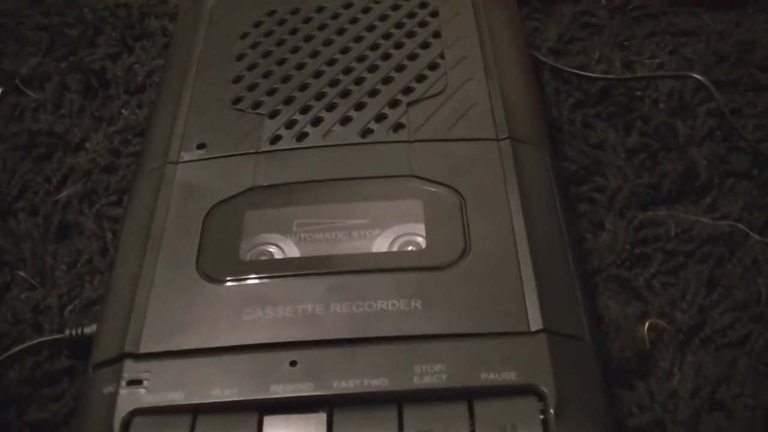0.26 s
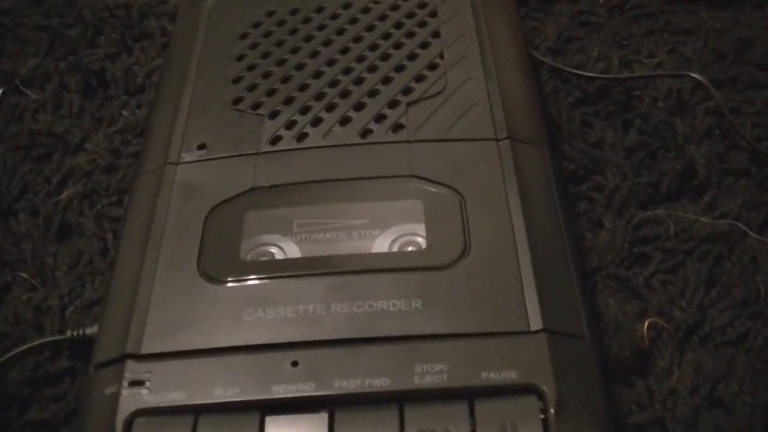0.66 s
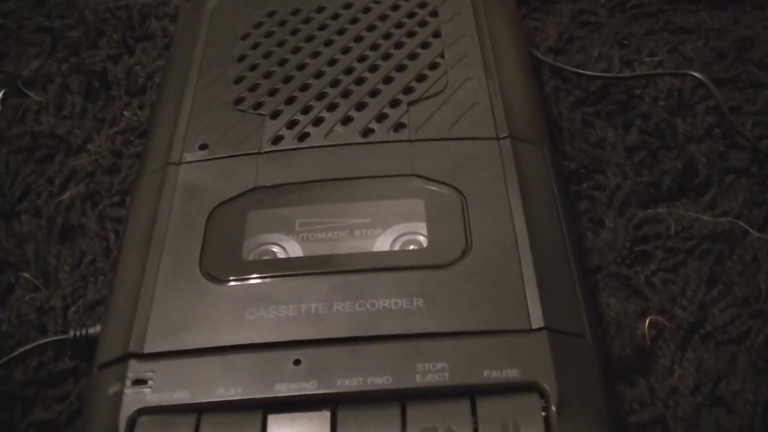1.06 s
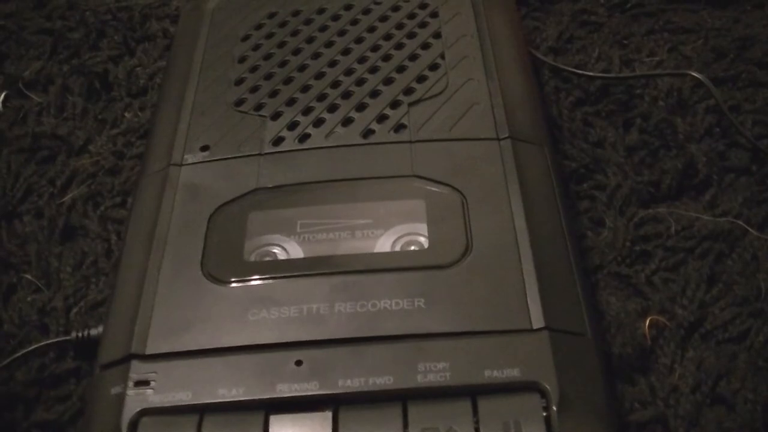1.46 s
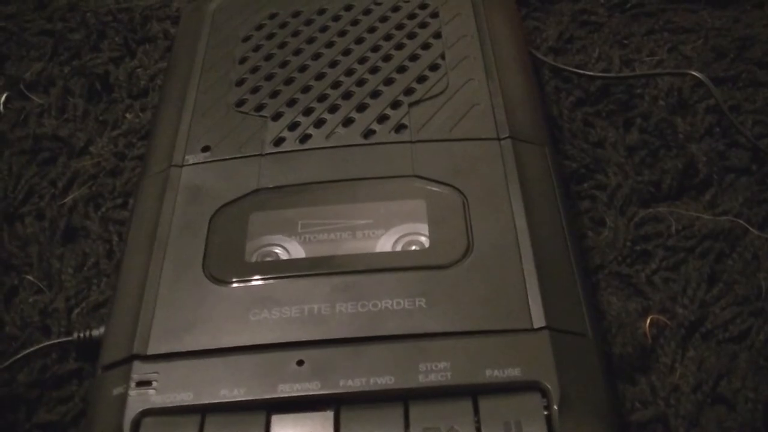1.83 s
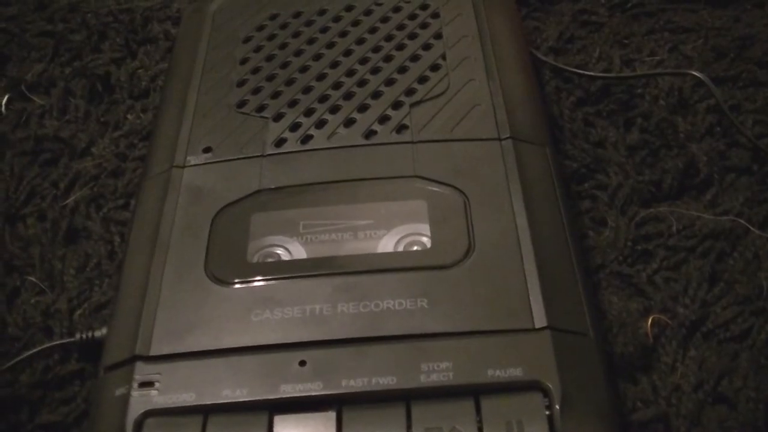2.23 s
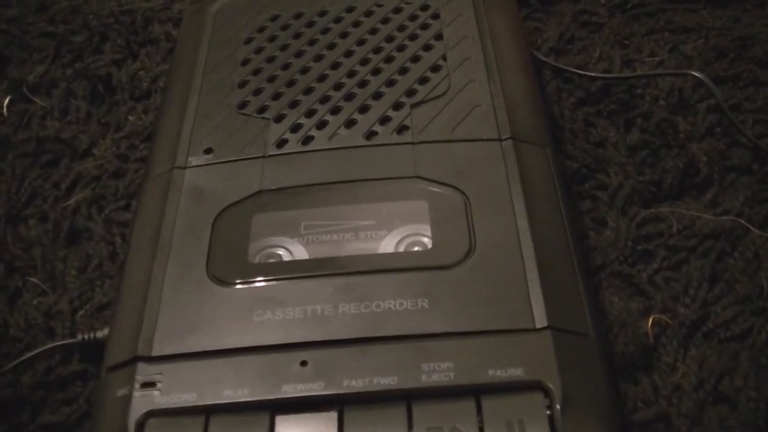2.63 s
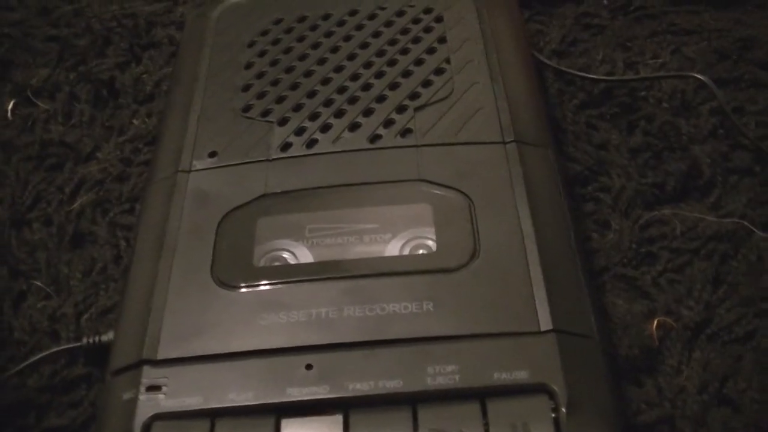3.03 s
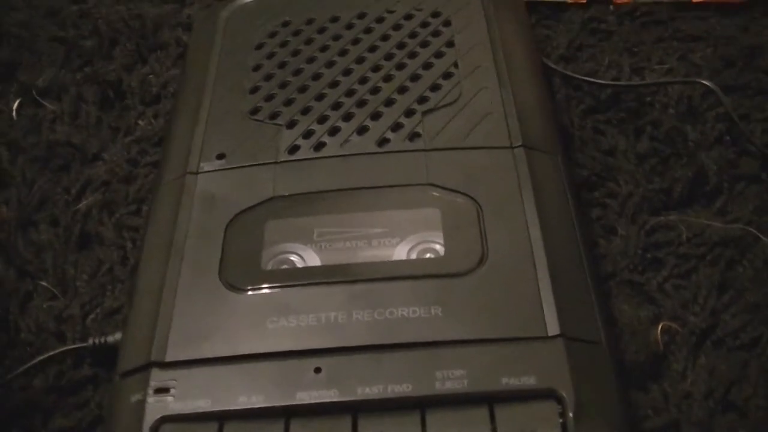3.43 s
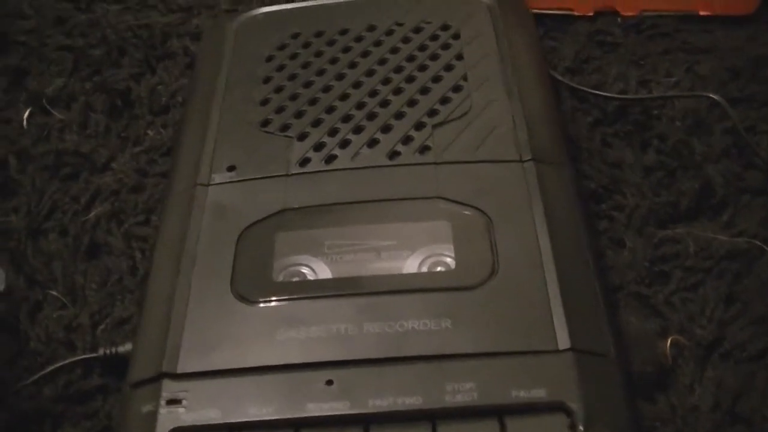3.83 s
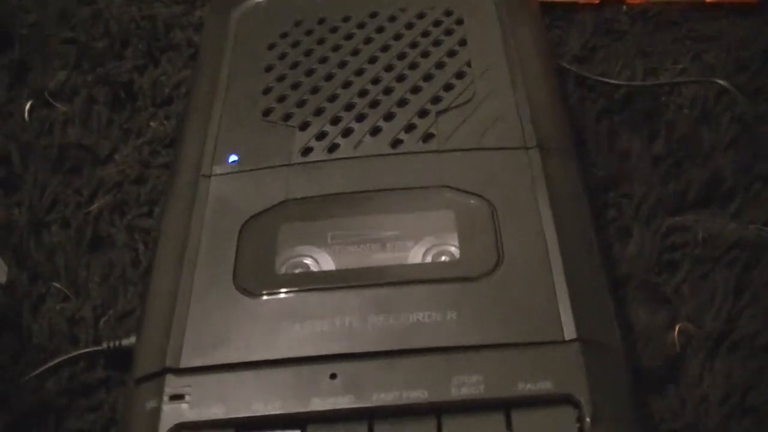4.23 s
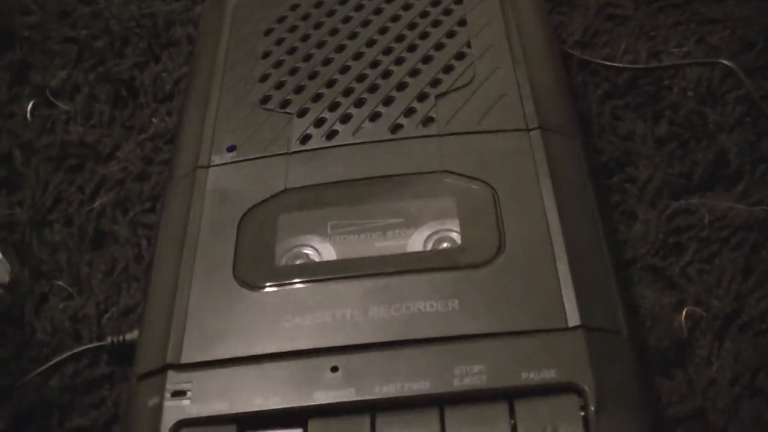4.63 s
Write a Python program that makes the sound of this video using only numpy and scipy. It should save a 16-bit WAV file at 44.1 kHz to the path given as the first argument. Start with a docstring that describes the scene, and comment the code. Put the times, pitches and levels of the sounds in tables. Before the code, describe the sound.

A cassette recorder rewinds with a fast bright plastic rattle, stops with a loud sharp key clack, then fainter clicks and faint speaker hiss.

```python
"""A fast rattle comes first: a cassette recorder rewinds, its drive shaft knocking the plastic case.
The tape runs out, the motor strains, a key snaps up, more keys are pressed and a loudspeaker hisses.
Each contact or key blow is a short noise burst or ring that excites resonances of the machine.
Friction, motor and loudspeaker are filtered noise; the loudspeaker adds a breathy whistle.
It is heard from close by, almost in the middle, in a quiet furnished room."""
import sys
import numpy as np
from scipy import signal
from scipy.fft import rfft, irfft
from scipy.io import wavfile
from scipy.ndimage import uniform_filter1d

SR = 44100
rng = np.random.default_rng(int(sys.argv[2]) if len(sys.argv) > 2 else 0)


def persist_wave(psi):
    """Save psi, clipped to +-1, as 16-bit WAV."""
    counts = np.round(np.clip(psi, -1, 1) * 32767).astype(np.int16)
    wavfile.write(sys.argv[1], SR, np.atleast_2d(counts).T)


def nominal_scale(level):
    """Amplitude ratio for a level in decibels (scalar or array-like)."""
    x = np.asarray(level, float) / 20
    return 10 ** x


N = 215230
T = np.arange(N) / SR   # time of every sample, in seconds

# Quiet room, colour of its noise: pitch_hz, relative_level_db
ROOM_TONE_COLOUR = [(18, -77), (30, -45), (149, -15), (170, -10), (245, -8), (287, -1), (554, -5.5),
                    (844, -0.5), (1390, -6.5), (1720, -5), (1960, -5.5), (2830, -8.5), (3670, -14),
                    (4300, -16.5), (16000, -29.5)]
# Steady hum: pitch_hz, rms_level_db
HUM_TONES = [(178, -83)]
# Dull bumps on the housing: start_s, relative_level_db
HOUSING_BUMPS = [(0.102, -62), (0.131, -50), (0.173, -53)]
# Loudspeaker hiss, its resonances: pitch_hz, width_hz, relative_level_db
HISS_RESONANCES = [(3700, 300, 3), (4700, 1500, -8), (6600, 1600, -7), (11000, 3000, -14)]
# Motor straining against the stopped tape: time_s, level_db
STRAIN_LEVEL = [(2.76, -47), (2.85, -65), (3.14, -62), (3.16, -84.5)]
# Resonances of the straining motor: pitch_hz, width_hz, relative_level_db
STRAIN_RESONANCES = [(1720, 1200, 0.5), (3050, 680, 2.5), (5860, 1200, -11.5), (13400, 500, -16)]
# Colour of the shaking springs and levers: pitch_hz, relative_level_db
SHAKING_COLOUR = [(180, -51), (300, -30.5), (603, -10.5), (701, 0), (828, -8), (1060, -4.5), (1150, -3),
                  (2210, -13), (3350, -9.5), (8500, -15), (16000, -35)]
# Low, middle and high case modes under a key: pitch_hz, relative_level_db, fall_by_60_db_s
THUD_MODES = [(526, -10, 0.084), (635, 1, 0.015), (756, 3.5, 0.043), (958, 1.5, .045), (1193, 1.5, 0.035),
              (1356, 0.5, 0.033), (1398, 0.5, .025), (1980, -3, 0.025)]
CRACK_MODES = [(2150, -4, .007), (2700, -4, .006), (3150, -2, .007), (3900, -2, .006), (4600, -4, .005),
               (5200, -5, .005), (5800, -4, .005)]
TREBLE_MODES = [(6170, 5, 0.0037), (7750, 2, 0.0033), (7650, 4.5, 0.002), (9000, 1, 0.0018),
                (9930, -2.5, 0.0045), (11600, -10.5, 0.0071), (14400, -19, 0.00067)]
# Latches and keys that snap: peak_s, thud_peak_db, crack_peak_db, treble_peak_db, fall_ms
KEY_SNAPS = [(2.7686, -28, -24.5, -29, 4.5), (3.065, -41, -49, -45, 6.2), (3.117, -45, -63, -52, 1.8),
             (3.134, -36.5, -42.5, -47, 6.7), (3.1461, -35, -31, -27, 1.2),
             (3.1492, -20.5, -11.5, -1, 0.41), (3.1512, -22, -16.5, -11, 1.8), (3.199, -35, -21, -16, 3.5),
             (3.2052, -19.5, -11.5, -10.5, 3.9), (3.376, -50, -43, -36, 3.6),
             (3.381, -44.5, -34.5, -35, 2.1), (3.942, -45, -53, -52, 1.3), (4.139, -47.5, -61, -60, 1.8),
             (4.155, -45, -45.5, -45.5, 2.3), (4.208, -42, -34, -40, 3.6), (4.31, -45.5, -49, -56, 3.1),
             (4.4155, -53, -23.5, -21, 3), (4.421, -27.5, -38, -40, 0.84), (4.4707, -43.5, -37, -66, .25),
             (4.7943, -52, -46, -44, 1.5), (4.7994, -31.5, -54.5, -56, 1.7)]
# Keys pushed slowly over a catch: peak_s, thud_peak_db, crack_peak_db, rise_ms
KEY_PUSHES = [(2.794, -36, -39.5, 3.2), (3.938, -43, -61, 3.9), (3.955, -45, -61.5, 4.5),
              (4.2, -44.5, -44.5, 8.5), (4.247, -38.5, -48, 11), (4.255, -31, -30, 4.6),
              (4.413, -34, -40, 3.6)]
# Contacts in one shaft turn: place_turns, relative_level_db, scatter_db, idler_swing_db, relative_main_ring_db
SHAFT_CONTACTS = [(-.09, -37, 3, 0.7, -15), (0.191, -42, 10, 3.5, -6.5), (0.476, -52, 5, -3.7, -31)]
# Load on the shaft, added to every usual contact: time_s, change_db
LOAD_ON_SHAFT = [(0, -2.5), (.5, -2.5), (1.2, 0.5), (1.6, 0.5), (2.0, 0), (2.4, 0), (2.76, -2.5)]
# Hardest contacts: ring_top_s, main_ring_db, relative_chatter_db
HARD_KNOCKS = [(0.6057, -33, -38), (0.677, -37, -35), (0.6846, -30, -39), (0.8954, -37.5, -34.5),
               (1.062, -33, -38), (1.179, -36.5, -39), (1.2181, -36, -35.5), (1.29, -37, -36.5),
               (1.297, -33.5, -47), (1.602, -29, -35), (1.626, -32, -34), (1.7118, -34, -35),
               (1.7182, -31.5, -38), (1.835, -39, -35.5), (1.86, -34, -45), (1.8816, -36.5, -42),
               (1.9302, -36, -37), (1.953, -31.5, -33), (1.977, -33.5, -39), (2.0, -34.5, -38),
               (2.0477, -31.5, -37.5), (2.0703, -35.5, -34), (2.1872, -30, -35), (2.3956, -32, -38),
               (2.4187, -36.5, -47), (2.5798, -36, -39), (2.6884, -42, -35)]
# Resonances of the transport and case: pitch_hz, width_hz, relative_level_db
CASE_RESONANCES = [(607.5, 39, -14.5), (988, 29.6, -4), (1260, 41, -9), (1810, 130, -13), (3627, 116, -3),
                   (4710, 78, -13.5), (5240, 79, -8.5), (6206, 63, -9), (7010, 300, -14), (7570, 76, -14),
                   (9250, 700, -15), (9920, 370, -13.5), (10730, 640, -16.5)]
# Broad colour under those resonances: pitch_hz, relative_level_db
RUNNING_COLOUR = [(180, -29), (300, -46), (800, -19), (2000, -9.5), (2800, -17.5), (3600, -10),
                  (6000, -5.5), (8200, -12), (10000, -18), (12000, -19), (14500, -26), (16000, -33)]

ROOM_TONE_DB, ROOM_T60_S, ROOM_DB, TONE_SIDE_DB = -60.5, 0.33, -20.5, -21

# loudspeaker: hiss and whistle rise until HISS_FULL_S, the hiss alone sinks after HISS_UNTIL_S
HISS_FULL_S, HISS_UNTIL_S, HISS_DB = 4.423, 4.83, -64
HISS_RISE_DB_PER_S, HISS_FALL_DB_PER_S = 108.5, 45
WHISTLE_HZ, WHISTLE_WIDTH_HZ, WHISTLE_DB = 10330, 420, -68.5
WHISTLE_RISE_HZ_PER_S, WHISTLE_SAG_HZ_PER_S, WHISTLE_STEP_HZ = 2800, 350, -130
WHISTLE_DIP_S, WHISTLE_DIP_DB, WHISTLE_DIP_MS = 4.785, -2, 14

# springs and levers shake from the first snap of the key to the second, then die away
SHAKE_FROM_S, SHAKE_UNTIL_S, SHAKE_DB, SHAKE_FALL_DB_PER_S = 3.153, 3.202, -35.5, 201
JOLT_DB, JOLT_FALL_DB_PER_S = -27.5, 1500.5
SNAP_RISE_MS, SNAP_RISE_SHARE = 0.55, 0.078   # rise time: a base plus a share of the fall
PUSH_TREBLE_DB, PUSH_FALL_MS = -4.5, 3.4      # treble relative to the crack; fall time

# the shaft gains SPEED_UP turns/s times the square of the time in seconds
START_TURN, SHAFT_TURNS_PER_S, SPEED_UP, TAPE_END_S = .41, 42.3, .121, 2.768
IDLER_RATIO, IDLER_PHASE = .384, -1.41   # idler turns per shaft turn; start in radians
WANDER_DB, WANDER_TURNS = 1.5, 6         # each contact tightens and loosens over some turns
SLIP_S, SLIP_DB = 2.72, -8               # contacts weaken as the tape slips just before the stop
MAIN_RING_HZ, MAIN_RING_MS, MAIN_RING_LAG_MS = 3600, 1.7, 3.2
RING_LIMIT_DB, RING_LIMIT_RISE_DB_PER_S = -42, 6   # usual contacts ring no louder than this
STRAYS_PER_S, STRAY_DB = 70, -45         # loose play ticks between contacts; relative level
FRICTION_DB, FRICTION_RISE_DB_PER_S = -52.5, 0.33     # relative level of gear friction
TAPE_HISS_DB, TAPE_HISS_RISE_DB_PER_S = -94, 15.0     # relative level; rubs harder as it speeds up
TAPE_STEADY_SHARE, TAPE_JERK_DB = .55, 41             # each contact jerks the tape and its hiss
MICROPHONE_LOW_CUT_HZ = 470


def rms_one(x):
    """Scale a sound to an average strength (rms) of 1."""
    return x / np.sqrt(np.mean(x ** 2) + 1e-30)


def colour(x, points):
    """Filter with a given loudness at each pitch, responding as early as possible (minimum phase)."""
    hz, level_db = np.transpose(points)
    grid = np.maximum(np.arange(2049) * SR / 4096, 1)
    cepstrum = irfft(np.log(nominal_scale(np.interp(np.log(grid), np.log(hz), level_db))))
    # fold the second half onto the first to get minimum phase
    cepstrum[1:2048] *= 2
    cepstrum[2049:] = 0
    return signal.fftconvolve(x, irfft(np.exp(rfft(cepstrum))))[:N]


def resonate(x, hz, width_hz):
    """A part that rings at one pitch; gain 1 at the top, and a narrower width rings longer."""
    r = np.exp(-np.pi * width_hz / SR)
    feedback = [1, -2 * r * np.cos(2 * np.pi * hz / SR), r * r]
    return signal.lfilter([(1 - r * r) / 2, 0, (r * r - 1) / 2], feedback, x + 1e-18)


def bursts(seconds, sizes, ms):
    """Loudness curve that swells and dies within a few ms of each moment."""
    marks = np.full(N, 1e-18)
    r = np.exp(-1000 / (ms * SR))
    places = np.clip((np.asarray(seconds) * SR).astype(int), 0, N - 1)
    np.add.at(marks, places, sizes)
    return signal.lfilter([4 * (1 - r) ** 2], np.poly([r, r, r]), marks)


def swell(full_s, until_s, rise_per_s, fall_per_s):
    """A straight rise to 0, a hold and a straight fall, for levels or pitches."""
    return -rise_per_s * np.maximum(full_s - T, 0) - fall_per_s * np.maximum(T - until_s, 0)


def hiss_through(peaks):
    """Noise heard through a set of steep resonances, scaled to rms 1."""
    out = np.zeros(N)
    for hz, width_hz, level_db in peaks:
        once = resonate(rng.standard_normal(N), hz, width_hz)
        out += nominal_scale(level_db) * resonate(once, hz, width_hz)
    return rms_one(out)


def room_tone():
    """The quiet room is steady noise with the room's colour."""
    return nominal_scale(ROOM_TONE_DB) * rms_one(colour(rng.standard_normal(N), ROOM_TONE_COLOUR))


def hum():
    """A steady hum is a pure tone; the root of 2 turns rms into peak height."""
    return sum(np.sqrt(2) * nominal_scale(level_db) * np.sin(2 * np.pi * hz * T) for hz, level_db in HUM_TONES)


def room(x):
    """Diffuse echoes as dulled, dying noise: one tail for the middle, one for the side signal."""
    t = np.arange(int(ROOM_T60_S * SR)) / SR
    fade = nominal_scale(-60 * t / ROOM_T60_S) * np.minimum(t / .008, 1)
    tails = signal.lfilter([1], [1, -.3], rng.standard_normal((2, len(t))) * fade)
    return signal.fftconvolve(x[None], tails / np.sqrt(np.sum(tails[0] ** 2)), axes=1)[:, :N]


def floor_echo(x):
    """A near reflection off the floor arrives 23 samples, about half a millisecond, late."""
    return np.concatenate([np.zeros(23), x[:-23]])


def bumps():
    """Soft low thumps on the housing that holds the microphone: short pushes into two resonances."""
    start_s, level_db = np.transpose(HOUSING_BUMPS)
    pushes = bursts(start_s, nominal_scale(level_db), ms=0.35)
    return nominal_scale(10.0) * resonate(resonate(pushes, 275.0, 200), 260, 200)


def whistle():
    """A narrow band of noise whose pitch climbs, sags and then steps down at a brief level dip."""
    hz = WHISTLE_HZ + swell(HISS_FULL_S, HISS_FULL_S, WHISTLE_RISE_HZ_PER_S, WHISTLE_SAG_HZ_PER_S)
    hz += WHISTLE_STEP_HZ * (T > WHISTLE_DIP_S)
    dip = np.exp(-.5 * ((T - WHISTLE_DIP_S) * 1000 / WHISTLE_DIP_MS) ** 2)
    low = signal.butter(2, WHISTLE_WIDTH_HZ / 2, fs=SR, output="sos")
    slow = signal.sosfilt(low, rng.standard_normal((2, N)))
    # slow noise on a moving tone makes the tone breathy
    phase = 2 * np.pi * np.cumsum(hz) / SR
    breathy = slow[0] * np.cos(phase) + slow[1] * np.sin(phase)
    return nominal_scale(WHISTLE_DB + WHISTLE_DIP_DB * dip) * rms_one(breathy)


def loudspeaker():
    """Hiss and whistle come up together; the hiss sinks after the last key."""
    rise_db = swell(HISS_FULL_S, N / SR, HISS_RISE_DB_PER_S, 0)
    fall_db = swell(0, HISS_UNTIL_S, 0, HISS_FALL_DB_PER_S)
    hiss = nominal_scale(HISS_DB + fall_db) * hiss_through(HISS_RESONANCES)
    return nominal_scale(rise_db) * (hiss + whistle())


def motor_strain():
    """The motor strains against the stopped tape: resonant noise that follows a level curve."""
    time_s, level_db = np.transpose(STRAIN_LEVEL)
    curve_db = np.interp(T, time_s, level_db, left=-140, right=-140)
    return nominal_scale(curve_db) * hiss_through(STRAIN_RESONANCES)


def shaking():
    """Springs and levers shake: dense uneven noise grains, with a first jolt, that die away."""
    grains = rng.standard_normal(N) * nominal_scale(2.5 * rng.exponential(1, N))
    steady = nominal_scale(SHAKE_DB + swell(SHAKE_FROM_S, SHAKE_UNTIL_S, 15000, SHAKE_FALL_DB_PER_S))
    jolt = nominal_scale(JOLT_DB + swell(SHAKE_FROM_S, SHAKE_FROM_S, 15000, JOLT_FALL_DB_PER_S))
    return (steady + jolt) * rms_one(colour(grains, SHAKING_COLOUR))


def key_blows():
    """Every blow as peak_s, thud_db, crack_db, treble_db, rise_ms, fall_ms."""
    blows = []
    for *blow, fall_ms in KEY_SNAPS:
        blows.append((*blow, SNAP_RISE_MS + SNAP_RISE_SHARE * fall_ms, fall_ms))
    for peak_s, thud_db, crack_db, rise_ms in KEY_PUSHES:
        blows.append((peak_s, thud_db, crack_db, crack_db + PUSH_TREBLE_DB, rise_ms, PUSH_FALL_MS))
    return blows


def ring_modes(blow, modes):
    """A blow sets every mode of the case ringing, each a little stronger or weaker by chance."""
    out = np.zeros(len(blow))
    for k, (hz, level_db, t60_s) in enumerate(modes):
        strength = (-1) ** k * nominal_scale(level_db + rng.uniform(-3, 3)) * np.sqrt(hz * t60_s)
        out += strength * resonate(blow, hz, 2.2 / t60_s)
    return out


def keys():
    """A key blow is a burst of tiny impacts into the low, middle and high modes of the case."""
    out = np.zeros(N)
    soft = signal.butter(3, 1700, fs=SR, output="sos")       # heavy parts touch softly
    middle = signal.butter(2, [1500, 6500], "band", fs=SR, output="sos")
    sharp = signal.butter(2, [5000, 12500], "band", fs=SR, output="sos")
    ms = (np.arange(4096) - 1024) / SR * 1000                # time from the peak
    for peak_s, thud_db, crack_db, treble_db, rise_ms, fall_ms in key_blows():
        impacts = rng.standard_normal(4096) * (rng.random(4096) < .5)
        rise = np.exp(-(ms / max(rise_ms, .1)) ** 2)
        fall = np.exp(-np.abs(ms) / max(fall_ms, .1))
        impacts *= np.where(ms < 0, rise, fall)
        start = round(peak_s * SR) - 1024
        layers = ((THUD_MODES, thud_db, soft), (CRACK_MODES, crack_db, middle),
                  (TREBLE_MODES, treble_db, sharp))
        for modes, peak_db, contact in layers:
            rung = ring_modes(signal.sosfilt(contact, impacts), modes)
            # the dry contact itself
            scuff = signal.sosfilt(contact, impacts * rng.choice([-1, 1], size=4096))
            rung += nominal_scale(-2) * rms_one(signal.sosfilt(contact, scuff)) * np.std(rung)
            out[start:start + 4096] += (nominal_scale(peak_db) * rung / np.max(np.abs(rung)))[:N - start]
    return out


def contacts():
    """Moment, chatter and main-ring level of each contact; a slower idler wheel swings the strength."""
    s = np.linspace(0, TAPE_END_S, 200)
    turns = START_TURN + SHAFT_TURNS_PER_S * s + SPEED_UP * s ** 3 / 3
    place, contact_db, scatter_db, swing_db, ring_db = np.transpose(SHAFT_CONTACTS)
    turn = np.arange(1, int(turns[-1]) + 1)[:, None]
    draw = rng.standard_normal((len(turn), 4, 3))
    when = np.interp(turn + place + 0.013 * draw[:, 0], turns, s)
    wander = uniform_filter1d(draw[:, 3], size=WANDER_TURNS, axis=0) * np.sqrt(WANDER_TURNS)
    level_db = contact_db + np.interp(when, *np.transpose(LOAD_ON_SHAFT))
    level_db += swing_db * np.cos(2 * np.pi * IDLER_RATIO * turn + IDLER_PHASE)
    # the play of the parts caps the random part of a blow
    level_db += np.minimum(scatter_db * draw[:, 1] + WANDER_DB * wander, 2.5)
    ring_limit_db = RING_LIMIT_DB + RING_LIMIT_RISE_DB_PER_S * when
    ring_db = np.minimum(level_db + ring_db + 2.7 * draw[:, 2], ring_limit_db)
    slip_db = SLIP_DB * (when > SLIP_S)
    level_db, ring_db = (level_db + slip_db).ravel(), (ring_db + slip_db).ravel()
    when = when.ravel()
    # each hard knock takes the place of the nearest usual contact
    for top_s, knock_ring_db, chatter_db in HARD_KNOCKS:
        start_s = top_s - MAIN_RING_LAG_MS / 1000
        nearest = np.argmin(np.abs(when - start_s))
        when[nearest], ring_db[nearest], level_db[nearest] = start_s, knock_ring_db, chatter_db
    return when, level_db, ring_db


def main_ring(when, level_db):
    """One loose part sings for a few ms after each contact; its pitch creeps up over time."""
    out, t = np.zeros(N + 1024), np.arange(1024) / SR
    shape = np.exp(-.5 * ((t * 1000 - MAIN_RING_LAG_MS) / MAIN_RING_MS) ** 2)
    shape *= np.minimum(t * 1500, 1)
    chances = rng.standard_normal((len(when), 2))
    for s, size, (detune, phase) in zip(when, nominal_scale(level_db), chances):
        start = round(s * SR)
        hz = MAIN_RING_HZ + 25 * s + 45 * detune
        out[start:start + 1024] += size * shape * np.sin(2 * np.pi * hz * t + 10 * phase)
    return out[:N]


def rewinding():
    """Each contact is a short chatter that strikes every resonance differently; friction feeds them."""
    when, level_db, ring_db = contacts()
    running = T < TAPE_END_S
    friction = nominal_scale(FRICTION_DB + FRICTION_RISE_DB_PER_S * T) * running
    tape_hiss = nominal_scale(TAPE_HISS_DB + TAPE_HISS_RISE_DB_PER_S * T) * running
    tape_hiss *= TAPE_STEADY_SHARE + bursts(when, nominal_scale(level_db + TAPE_JERK_DB), ms=1.4)
    white = rng.standard_normal((4, N))
    rubbing = signal.lfilter([.4], [1, -.6], white[3]) * friction   # friction is duller than the chatter
    chatter = white[0] * nominal_scale(5.5) * bursts(when, nominal_scale(level_db), ms=0.79)
    out = colour(chatter + nominal_scale(15) * rubbing, RUNNING_COLOUR)
    out += main_ring(when, ring_db)
    out += nominal_scale(4) * tape_hiss * resonate(white[2], 12500, 6000)
    stray_s, stray_size = rng.random((int(STRAYS_PER_S * TAPE_END_S), 2)).T
    for k, (hz, width_hz, mode_db) in enumerate(CASE_RESONANCES):
        # the quick chatter hardly moves the low panels
        reach_db = -14 * np.clip(np.log2(2500 / hz), 0, 1.5)
        strike_db = level_db + reach_db + rng.normal(0, 3.06, len(when))
        stray_db = STRAY_DB + reach_db + 6.7 * stray_size + rng.normal(0, 4.5, len(stray_s))
        rub_db = 22 - 3.7 * np.log2(hz / 1000)
        hits = bursts(when, nominal_scale(strike_db), ms=1.0)
        hits += bursts(stray_s * TAPE_END_S, nominal_scale(stray_db), ms=0.6)
        push = white[1] * (nominal_scale(13.0) * hits + nominal_scale(rub_db) * friction)
        out += (-1) ** k * nominal_scale(mode_db) * resonate(push, hz, width_hz)
    return out


def scene():
    """The machine in the middle; room tail, floor echo and room tone add a little width."""
    blows = keys() + shaking()
    machine = rewinding() + blows + motor_strain() + loudspeaker()
    # the microphone cuts the bass of the machine steeply
    low_cut = signal.butter(8, MICROPHONE_LOW_CUT_HZ, "high", fs=SR, output="sos")
    machine = signal.sosfilt(low_cut, machine)
    tail = nominal_scale(ROOM_DB) * room(machine)
    mid = machine + tail[0] + room_tone() + hum() + bumps()
    # parts sit a little off centre
    lean = nominal_scale(-23) * resonate(machine, 3620, 500) + nominal_scale(-23.5) * resonate(blows, 5500, 7000)
    echo = nominal_scale(-29) * resonate(floor_echo(machine), 8000, 9000)
    side = nominal_scale(-27) * tail[1] + nominal_scale(TONE_SIDE_DB) * room_tone() + echo - lean
    return np.stack([mid + side, mid - side])


def band_limit(x):
    """A steep low-pass at the top of the band."""
    return signal.sosfilt(signal.butter(12, 16980, fs=SR, output="sos"), x)


def record(dry):
    """Peaks stop just under full scale, then a steep filter cuts the top."""
    limited = np.clip(dry, -.93, .93)
    top_cut = signal.cheby2(12, 45, 16400, fs=SR, output="sos")   # 45 dB down from 16400 Hz up
    mix = signal.sosfilt(top_cut, limited)
    return band_limit(mix)


dry = scene()
out = record(dry)
persist_wave(out)
```